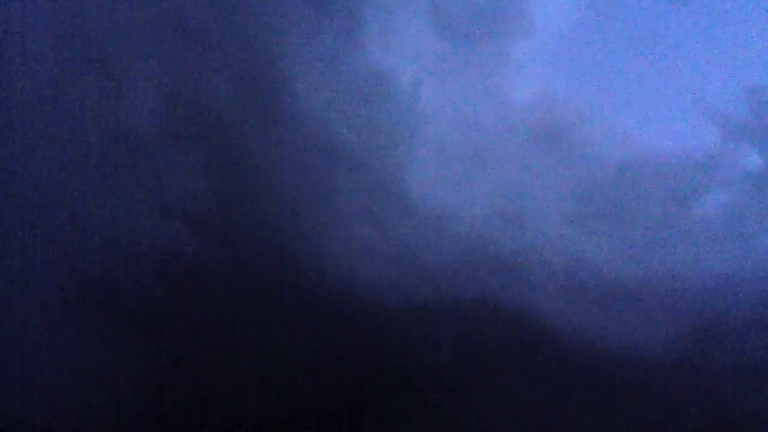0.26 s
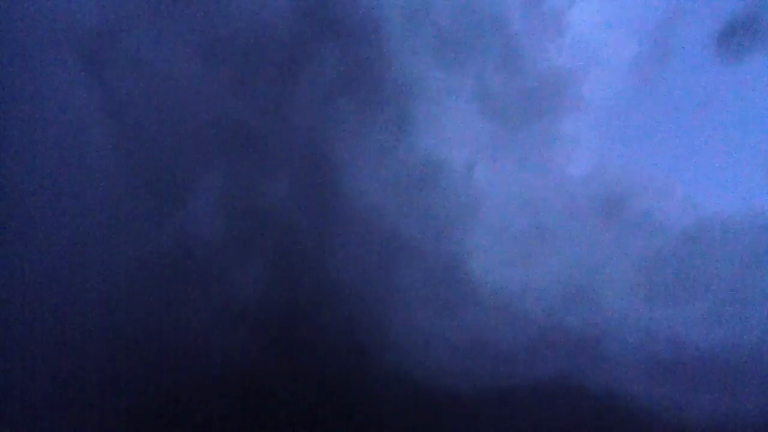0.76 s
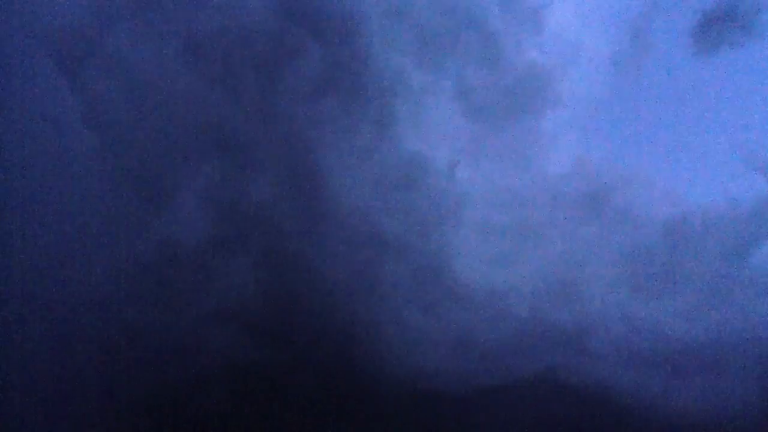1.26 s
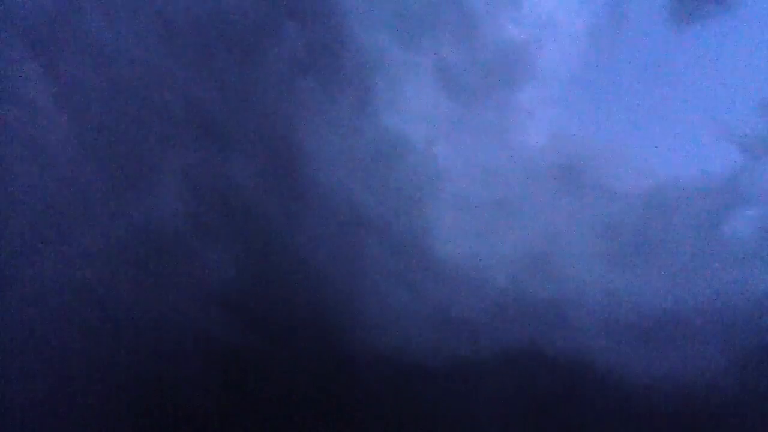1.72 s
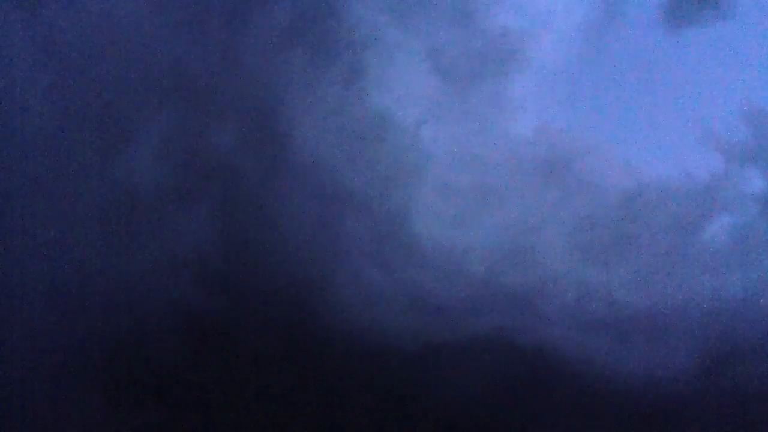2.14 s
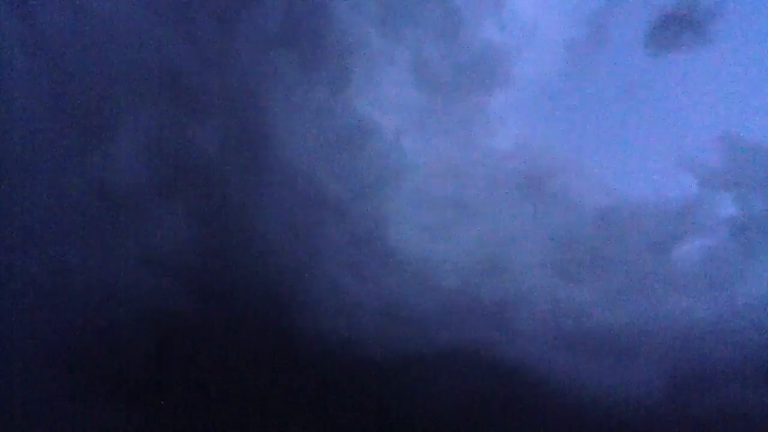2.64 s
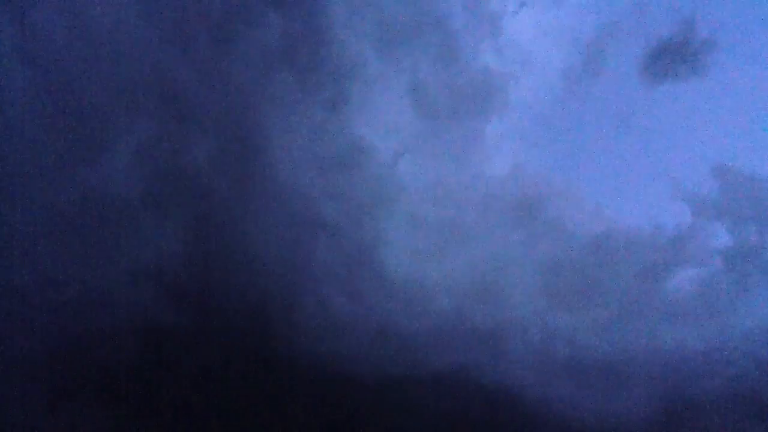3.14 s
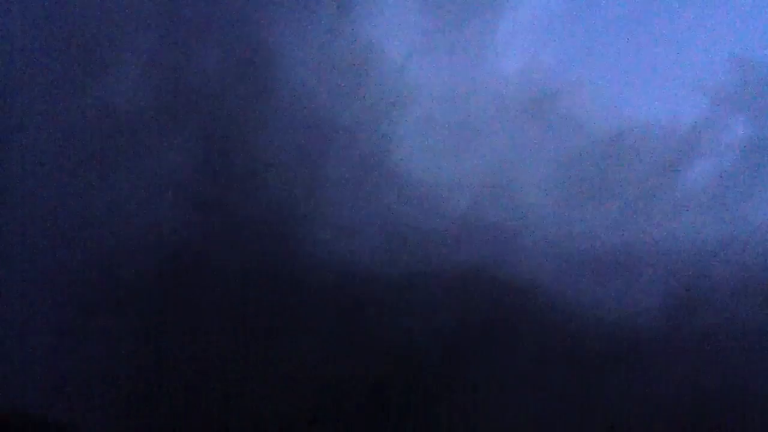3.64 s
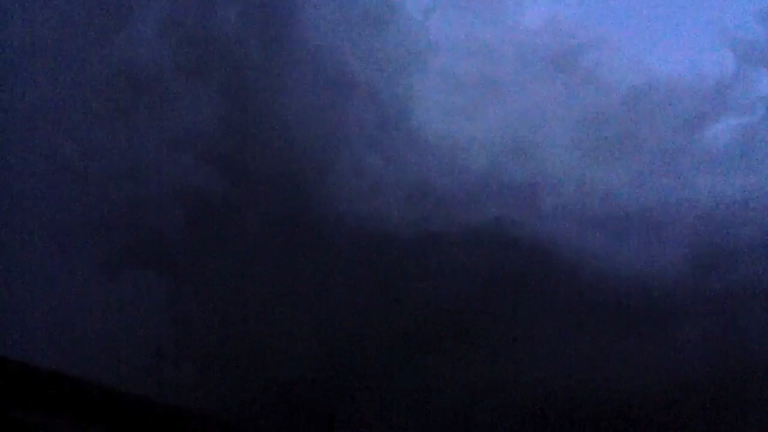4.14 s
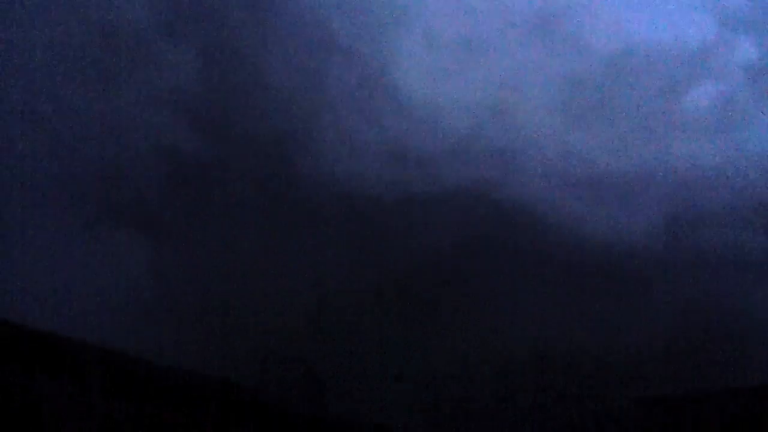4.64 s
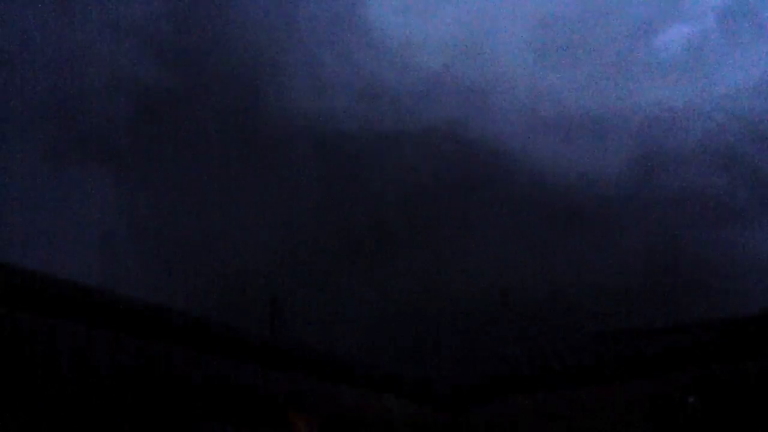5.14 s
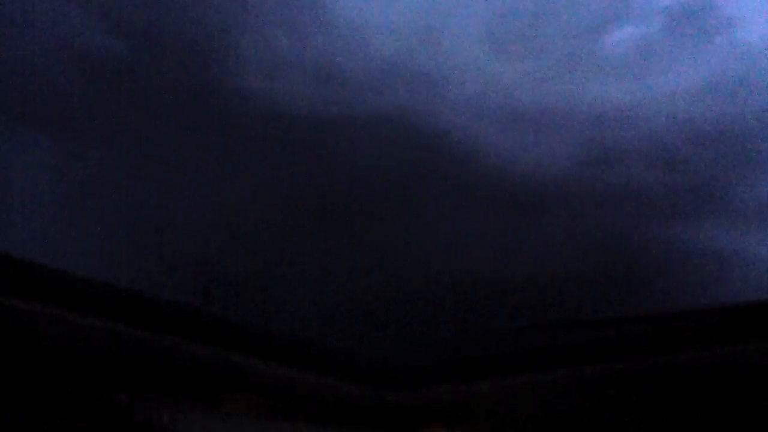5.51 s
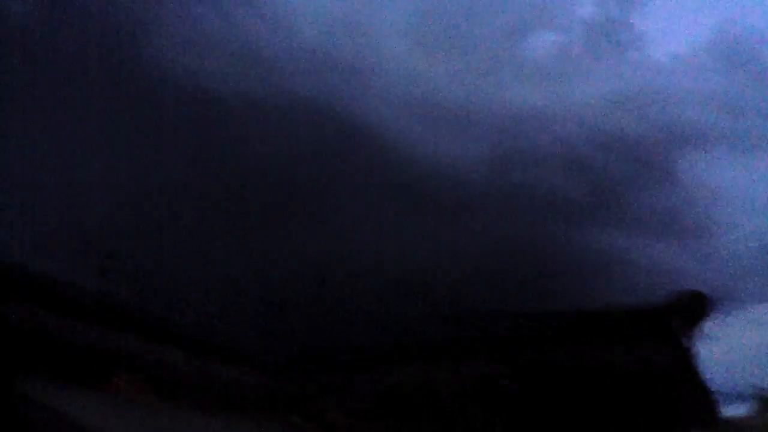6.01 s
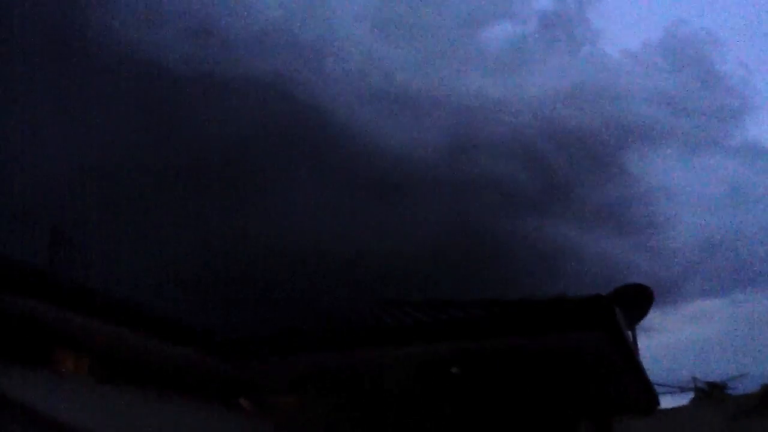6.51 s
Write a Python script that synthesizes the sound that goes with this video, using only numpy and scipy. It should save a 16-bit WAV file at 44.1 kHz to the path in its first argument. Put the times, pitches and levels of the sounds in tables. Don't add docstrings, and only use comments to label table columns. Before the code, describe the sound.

Heavy dull thunder booms in clustered thuds, rolls away, claps sharply once more and fades into a faint rumble over steadily trilling, chirping crickets.

```python
import sys
import numpy as np
from scipy import signal
from scipy.fft import rfft, irfft
from scipy.io import wavfile
from scipy.ndimage import uniform_filter1d

SR = 44100
rng = np.random.default_rng(int(sys.argv[2]) if len(sys.argv) > 2 else 0)


def wav_record(signal):
    frames = np.transpose(np.atleast_2d(signal))
    bounded = np.clip(frames, -1, 1)
    quanta = np.round(bounded * 32767).astype(np.int16)
    wavfile.write(sys.argv[1], SR, quanta)


def volts(x):
    e = np.asarray(x, float) / 20
    return 10 ** e


N = 297965


def evened(x):
    return x / np.sqrt(np.mean(x ** 2) + 1e-20)


def read(points, hz):
    f, value = np.transpose(points)
    return np.interp(np.log(hz + 1), np.log(f + 1), value)


def causal(db):
    log_gain = np.log(volts(np.maximum(db, -100)))
    full_circle = np.r_[log_gain, log_gain[-2:0:-1]]
    phase = -signal.hilbert(full_circle).imag[:len(db)]
    return irfft(np.exp(log_gain + 1j * phase))[:4096]


def wander(smooth_s):
    size = max(round(smooth_s * SR), 1)
    once = uniform_filter1d(rng.standard_normal(N), size)
    return evened(uniform_filter1d(once, size))


def resonate(x, hz, width):
    turn = np.exp(2j * np.pi * np.cumsum(hz * np.ones(len(x))) / SR)
    r = np.exp(-np.pi * width / SR)
    return (turn * signal.lfilter([(1 - r) ** 2], [1, -2 * r, r * r], x / turn)).real


# frequency in Hz, level in dB per Hz.
THUNDER = [(25, -52), (70, -32.5), (105, -17), (140, -3.5), (190, -0.5), (255, -4.5), (310, -4.5),
           (440, -16), (510, -18), (800, -26.5), (1000, -34), (1400, -47), (2200, -61), (4800, -100)]
SPLITS_HZ = (127, 348, 675)
LEAD = 400


def shock_parts(tone):
    hz = np.fft.rfftfreq(16384, 1 / SR)
    whole = rfft(causal(read(THUNDER, hz) + tone(hz)), 16384)
    below = [0 * hz]
    below += [1 / (1 + (hz / split_hz) ** 5) for split_hz in SPLITS_HZ]
    below += [hz ** 0]
    parts = irfft(whole * np.diff(below, axis=0))
    parts = np.roll(parts, LEAD, axis=1)[:, :4096]
    return parts / abs(parts.sum(0)).max()


# loudest moment in seconds, level in dB,
# rise in seconds per 10 dB, fall in seconds per 10 dB, nearness in dB.
PEALS = [(0.04, -17.5, 0.5, 0.05, -1), (0.21, -13, 0.17, 0.5117, 1.06), (0.83, -17.5, 0.12, 0.0455, -2.5),
         (0.94, -16.5, 0.07, 0.46, -3), (1.63, -21.5, 0.06, 0.0553, -6), (2.2, -37.5, 0.18, 0.5, 14),
         (2.44, -24.1, 0.31, 0.13, -8.3), (2.71, -23.5, 0.07, 0.1565, 0.3), (3.03, -36, 0.3, 0.36, -5.5),
         (3.58, -39.5, 0.64, 0.06, -15.0), (3.71, -39, 0.03, 0.2, -11), (3.94, -30.5, 0.06, 0.1, -0.5),
         (4.27, -29.2, 0.26, 0.65, 0.6), (4.71, -35.0, 0.25, 0.15, 4.5), (5.45, -34.5, 0.52, 0.17, -6),
         (5.63, -34.5, 0.31, 0.42, -0.5), (6.1, -38, 0.27, 0.1, -0.5), (6.39, -34, 0.09, 0.4, -8.5)]
# time in seconds, lift in dB, middle in Hz.
LUMPS = [(0.22, -6, 700.0), (0.43, -7.9, 100.0), (0.43, 4.5, 320.0), (0.77, 4, 480.0), (0.95, 2.5, 210.0),
         (1.12, 6.5, 480.0), (1.16, 5.5, 151), (1.23, 5.5, 480.0), (1.25, -7.0, 150.0), (1.41, 3, 480.0),
         (1.44, -4.1, 210.0), (1.52, 8, 100.0), (1.95, -5, 700.0), (1.95, -5, 100.0), (2.03, 5, 320.0),
         (2.24, 4.1, 210.0), (2.3, -3.5, 700.0), (2.75, -3, 480.0), (3.84, 6.5, 150.0), (4.29, 9, 100.0),
         (4.45, 2.6, 210.0), (4.93, 2, 150.0), (5.14, 4.5, 151), (5.2, -4, 210.0), (5.87, -3, 100.0),
         (5.91, 3.0, 210.0), (6.15, -5, 100.0), (6.42, -5.5, 480.0), (6.59, -8, 210.0), (6.72, 5.8, 480.0)]
LUMP_S, LUMP_OCTAVES = 0.036, .8
FAR_DB = -48


def band_db(hz, at_db, follow, share, smear):
    t = np.arange(0, N + 128, 128)[:, None] / SR
    s, db, rise, fall, near_db = np.transpose(PEALS)
    under_db = 10 * np.maximum((s - t) / rise, (t - s) / fall) / smear
    peals = volts(db + share * near_db - under_db)
    roll_db = 10 * np.log10((peals ** 2).sum(1) + volts(FAR_DB) ** 2)
    at, lift_db, lump_hz = np.transpose(LUMPS)
    octaves = np.log2(hz / lump_hz)
    lumps_db = lift_db * np.exp(-((t - at) / LUMP_S) ** 2 - (octaves / LUMP_OCTAVES) ** 2)
    return np.interp(np.arange(N) / SR, t[:, 0], at_db + follow * (roll_db + 20) + lumps_db.sum(1))


# middle in Hz, level in dB at a -20 dB peal,
# share of the peal's loudness, share of its nearness, smear of its rise and fall (ratios).
BANDS = [
    (100.0, -32, 0.68, -0.52, 0.84),
    (210.0, -20.0, 1.067, -0.2, 0.96),
    (480.0, -26.2, 1.02, 0.54, 1.12),
    (900.0, -38, 1.05, 1.176, 1.45),
]
# frequency in Hz, width in Hz, lift in dB.
HOLLOWS = [(145, 14, 3), (188, 22, 2), (227, 14, 7), (252, 12, 4), (425, 40, 4.5)]


def roll(per_s, spread_db, shared):
    def ringing(hz):
        return sum(db / (1 + (2 * (hz - f) / width) ** 2) for f, width, db in HOLLOWS)

    parts = shock_parts(ringing)
    draw = rng.uniform(-1, 1, (5, N + 4095))
    size = volts(spread_db * np.minimum(rng.exponential(1, N + 4095), 4))
    sizes = [np.roll(size, 1000 * k) for k in range(5)]
    shocks = np.sign(draw) * (abs(draw) < per_s / SR) * sizes
    out = np.zeros(N)
    for band, part, own in zip(BANDS, parts, shocks[1:]):
        mixed = shared * shocks[0] + (1 - shared) * own
        out += volts(band_db(*band)) * evened(signal.oaconvolve(mixed, part, "valid"))
    return out


# time in seconds, peak in dB, push or pull (1 or -1), sharpness in dB.
CLAPS = [(.40, -6.5, -1, -2.5), (0.636, -8.5, 1, -11), (.703, -5.5, 1, -1.5), (0.8, -27, 1, 4),
         (0.914, -6, 1, -7.5), (0.949, -22, 1, 3), (0.966, -13, 1, -5), (1.017, -18, -1, -5),
         (1.265, -9, -1, -8), (1.504, -17, 1, -7), (1.835, -31.5, 1, 4), (2.389, -14, -1, -10),
         (2.755, -34, 1, 13), (3.3223, -6, 1, -2.5), (3.327, -17, 1, -14), (3.347, -32, 1, 16.5),
         (3.354, -13, -1, -16), (3.364, -12, 1, -3), (3.372, -21, 1, -5), (3.394, -17.5, -1, -10),
         (3.4056, -11.5, 1, -8), (3.422, -26, -1, -7), (3.706, -27.5, 1, -11), (4.487, -20, 1, -13),
         (4.679, -30, 1, 3), (5.398, -25, 1, -9), (5.979, -31.5, 1, 1), (6.352, -23, 1, -14),
         (6.40, -23, -1, -14)]
CLAP_TOP_HZ = 925
CLAP_DEEP_DB = 4
SHARP_SHARE, RASP_TRIM_DB = (1.05, 1.1), -0.5


def claps():
    parts = shock_parts(lambda hz: -10 * np.log10(1 + (hz / CLAP_TOP_HZ) ** 6))
    out = np.zeros(N + 4096)
    for s, db, sign, sharp_db in CLAPS:
        at = round(s * SR) - LEAD
        growl_db = SHARP_SHARE[0] * sharp_db
        rasp_db = SHARP_SHARE[1] * sharp_db + RASP_TRIM_DB
        tone_db = np.array([CLAP_DEEP_DB, 0, growl_db, rasp_db])
        out[at:at + 4096] -= np.sign(sign) * volts(db) * (volts(tone_db) @ parts)
    return out[:N]


# level in dB at start, middle and end.
SINGERS_DB = [
    (-62.5, -60.5, -59.5),
    (-61.5, -62, -66),
]
PAIR_HZ, PAIR_LAG_S = (2155, 2055), (-.012, .008)
BEAT_S, BEAT_COUNT = (.03, 1.72, 5.51, 6.73), (0, 8, 26, 32)
CHIRP_S, CHIRP_SPREAD_DB, CHIRP_JITTER_S = 0.084, 1.2, .006
# chirp number, lift in dB.
ACCENTS = [
    (0, -6),
    (5, 3),
    (8, 4),
    (9, 2.5),
    (13, -4),
    (18, 2.5),
    (26, 3),
    (27, 2.5),
    (28, -4),
]
# time in seconds, level in dB.
STRAYS = [
    (1.02, -67),
    (1.72, -63),
    (1.95, -67),
    (3.62, -66),
    (4.32, -69),
    (4.97, -66),
    (5.2, -67),
    (5.9, -65),
    (6.16, -58),
    (6.5, -66),
]
STRAY_HZ = 1910
# width of the whistle in Hz, level in dB; below it their pitches in Hz.
TRILLS = [(108, -60), (220, -64.5), (129.6, -69), (510, -74)]
TRILLS_HZ = (2305, 2100, 1930, 4050)


def crickets():
    def whistle(hz, width):
        return evened(resonate(rng.standard_normal(N), hz, width))

    count = np.arange(BEAT_COUNT[-1] + 1)
    t, out = np.arange(N) / SR, np.zeros(N)
    accent_db = sum(lift_db * (count == k) for k, lift_db in ACCENTS)
    for levels_db, pitch_hz, lag in zip(SINGERS_DB, PAIR_HZ, PAIR_LAG_S):
        late, strong = rng.standard_normal((len(count), 2)).T
        s = np.interp(count, BEAT_COUNT, BEAT_S) + lag + CHIRP_JITTER_S * late
        db = np.interp(s, (0, N / SR / 2, N / SR), levels_db) + CHIRP_SPREAD_DB * strong + accent_db
        nearest = np.round(np.interp(t, s, count)).astype(int)
        swell = volts(db)[nearest] * np.exp(-(2 * (t - s[nearest]) / CHIRP_S) ** 4)
        wing_hz = pitch_hz + 22 * wander(.02)
        wing = np.sqrt(2) * np.sin(2 * np.pi * np.cumsum(wing_hz) / SR)
        out += swell * (0.86 * wing + 0.77 * whistle(pitch_hz, 70))
    stray = sum(volts(db) * np.exp(-(2 * (t - s) / CHIRP_S) ** 2) for s, db in STRAYS)
    out += stray * whistle(STRAY_HZ, 130)
    for hz, (width, db) in zip(TRILLS_HZ, TRILLS):
        out += volts(db + wander(.2)) * whistle(hz, width)
    return out


# start in seconds, end in seconds, level in dB.
SOLO = [
    (2.75, 3.35, -78),
    (5.0, 5.78, -77),
]
SOLO_HZ = 3895


def solo():
    t = np.arange(N) / SR
    on = sum(volts(db) * np.clip(np.minimum(t - start, end - t) / 0.046, 0, 1) for start, end, db in SOLO)
    return on * evened(resonate(rng.standard_normal(N), SOLO_HZ, 28))


# time in seconds, peak in dB, ring in Hz, ring time in seconds.
DROPS = [
    (3.2086, -48.5, 13600, .0001),
    (4.376, -42, 7000, .00009),
    (4.5211, -51, 6000, .0001),
    (4.775, -50, 6000, .0001),
    (5.0863, -51.5, 11000, .00015),
    (5.2999, -45, 11000, .0001),
    (5.6022, -45, 8500, .0001),
    (5.666, -55, 7000, .0001),
    (6.0013, -34.5, 12000, 0.000019),
]
SPLASH_S, SPLASH_DB = .0009, -0.5


def drops():
    out, t = np.zeros(N + 200), np.arange(200) / SR
    for s, db, hz, ring_s in DROPS:
        spray = rng.standard_normal(200) * np.exp(-t / SPLASH_S)
        at = round((s + .001) * SR)
        ring = 2 * volts(db + SPLASH_DB) * np.cos(2 * np.pi * hz * t) * np.exp(-t / ring_s)
        out[at:at + 200] += np.convolve(ring, spray / np.linalg.norm(spray))[:200]
    return out[:N]


def hiss(colour, patchy_db):
    frames, hz = N // 256 + 5, np.fft.rfftfreq(1024, 1 / SR)
    a, b, patches = rng.standard_normal((frames, 513, 3)).T
    patches = uniform_filter1d(patches, size=40, axis=0)
    patches = evened(uniform_filter1d(patches, size=14, axis=1))
    spectra = (a + 1j * b) * volts(read(colour, hz)[:, None] + patchy_db * patches)
    return evened(signal.istft(spectra, nperseg=1024, noverlap=768)[1][:N])


# frequency in Hz, level in dB per Hz.
BRUSH_COLOUR = [(1500, -30), (2600, -6.5), (3400, -4), (5000, -6.5), (6600, 0), (7900, -9), (9000, -4.5),
                (10200, -11), (12000, -15), (13500, -14.5), (15800, -9)]
# start in seconds, end in seconds, level in dB at the end, lift of the top octave in dB.
STROKES = [
    (.27, .44, -63, -2.5),
    (.45, 0.497, -55.5, 10),
    (.59, .655, -63.5, 12.5),
]
STROKE_RISE_DB, STROKE_FALL_DB_PER_S = 8.5, 500


def brush():
    t = np.arange(N) / SR
    scratch = volts(2.0 * wander(0.0018)) * hiss(BRUSH_COLOUR, patchy_db=2.5)
    top = signal.sosfilt(signal.butter(6, 12800, "high", fs=SR, output="sos"), scratch)
    out = np.zeros(N)
    for start, end, db, top_db in STROKES:
        to_go = np.clip((end - t) / (end - start), 0, 1)
        outside_s = np.maximum(np.maximum(start - t, t - end), 0)
        under_db = STROKE_RISE_DB * to_go + STROKE_FALL_DB_PER_S * outside_s
        out += volts(db - under_db) * (scratch + (volts(top_db) - 1) * top)
    return out


# frequency in Hz, level in dB per Hz.
HISS = [(30, -14.5), (100, -9), (300, 0.9), (700, 3), (1200, -7.5), (1700, -10.5), (2600, -13), (3600, -14),
        (4600, -17.5), (5500, -19), (6300, -19), (8000, -22.5), (11000, -24.5), (15500, -26.5)]
HISS_DB = -52.5
# time in seconds, half length in seconds, lift of the air in dB.
GUSTS = [
    (1.6, 0.054, 1),
    (3.95, 0.076, 1),
    (6.42, .1, 1.5),
]


def air():
    t = np.arange(N) / SR
    gust_db = sum(db * np.exp(-((t - s) / half) ** 2) for s, half, db in GUSTS)
    return volts(HISS_DB + gust_db + 0.52 * wander(.06)) * hiss(HISS, patchy_db=0.4)


OPEN_FROM, OPEN_S = .4, .003


def scene():
    thunder = roll(per_s=2500, spread_db=2.0, shared=0.17) + claps()
    opening = np.minimum(OPEN_FROM + np.arange(N) / SR / OPEN_S, 1)
    return (opening * (thunder + crickets() + solo() + drops() + brush() + air()))[None]


def roll_off(x):
    return signal.sosfilt(signal.butter(12, 16040, fs=SR, output="sos"), x)


def record(dry):
    edge = signal.firwin(1023, 15310, window=("kaiser", 9), fs=SR)
    mix = signal.oaconvolve(dry, edge[None], "same")
    return roll_off(mix)


dry = scene()
out = record(dry)
wav_record(out)
```